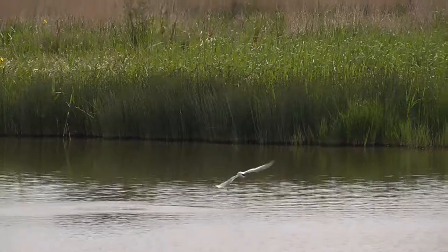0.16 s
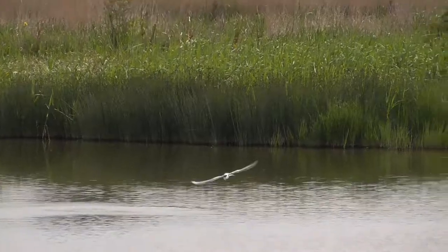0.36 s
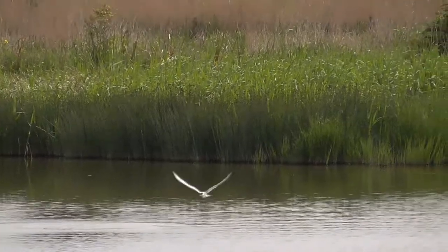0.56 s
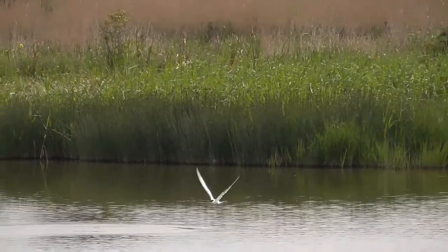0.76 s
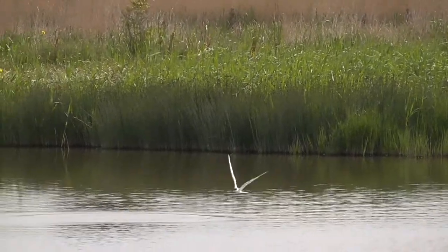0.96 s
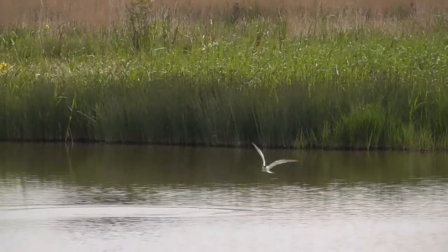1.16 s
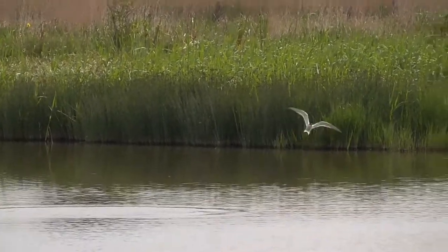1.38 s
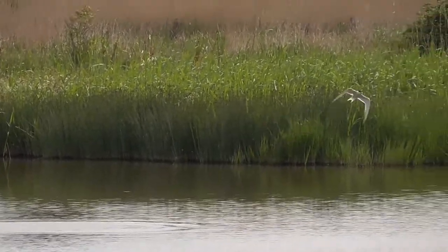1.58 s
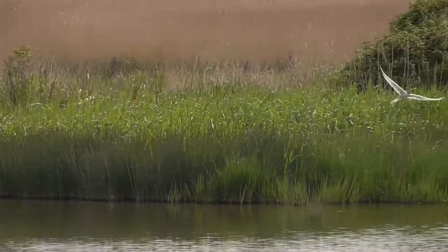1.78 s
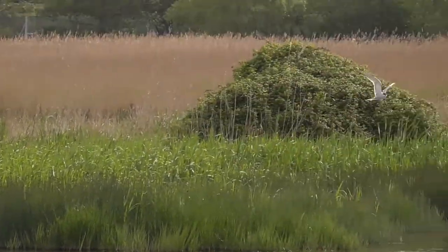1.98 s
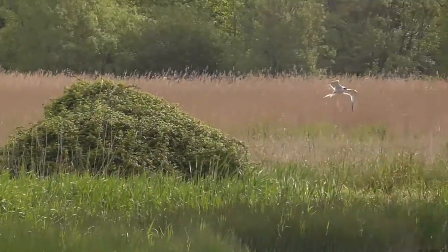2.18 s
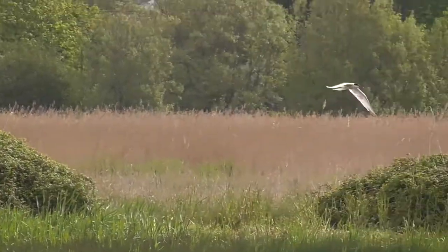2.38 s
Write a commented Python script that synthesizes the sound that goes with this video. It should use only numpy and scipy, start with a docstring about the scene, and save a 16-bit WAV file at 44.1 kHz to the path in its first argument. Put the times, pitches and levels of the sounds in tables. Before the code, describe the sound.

A tern gives two short, lightly echoing cries over a reedy pond, above a steady roar of distant traffic. A camera's focus motor ticks faintly at the microphone, and its plastic body snaps loudly near the end.

```python
"""Soft plastic clicks and the roar and hum of far traffic open out of a short silence. A tern calls
twice over a reed-fringed pond, each call an arching stack of harmonics that echoes off the banks.
A small bird whistles faintly. Up close, a camera's focus motor ticks in short runs, ringing its gears,
and the plastic body gives one loud snap near the end. The sound is nearly mono."""
import sys
import numpy as np
from scipy import signal
from scipy.io import wavfile
from scipy.ndimage import uniform_filter1d

SR = 44100
rng = np.random.default_rng(int(sys.argv[2]) if len(sys.argv) > 2 else 0)


def dump_mix(stems):
    """Bounce the given channels to the path in sys.argv[1] as a 16-bit WAV at rate SR."""
    frames = np.atleast_2d(stems).T  # one column per channel
    limited = np.clip(frames, -1, 1)  # hard clip at full scale
    pcm = np.round(limited * 32767).astype(np.int16)
    wavfile.write(sys.argv[1], SR, pcm)


N = 112014


def amp(db):
    return 10 ** (np.asarray(db, float) / 20)


def unit_rms(x):
    return x / np.sqrt(np.mean(x ** 2) + 1e-20)


def add(mix, start_s, sound):
    part = mix[..., round(start_s * SR):][..., :sound.shape[-1]]
    part += sound[..., :part.shape[-1]]


def jitter(count, smoothing):
    """Smoothed noise of rms 1."""
    return unit_rms(uniform_filter1d(rng.standard_normal(count), size=smoothing))


def drift(t, top_hz):
    """Slow random wander of rms 1."""
    rates = np.geomspace(.2, top_hz, 20)
    return unit_rms(sum(np.sin(2 * np.pi * (hz * t + rng.random())) / np.sqrt(hz) for hz in rates))


def ring(modes, gains, rise_s, stretch=1, phase=0):
    """Dying sines of a struck object; neighbouring modes alternate in polarity."""
    t = np.arange(3000) / SR
    tones = 0
    for k, (gain, (hz, db, t60)) in enumerate(zip(gains, modes)):
        decay = amp(db - 60 * t / (t60 * stretch))
        tones += (-1) ** k * gain * decay * np.sin(2 * np.pi * hz * t + phase * k)
    return tones * np.minimum(t / rise_s, 1)


def housing_notch_db(hz, centre_hz=5650, width_hz=600, depth_db=-16):
    """The microphone housing swallows a band of the tern's voice."""
    return depth_db * np.exp(-((hz - centre_hz) / width_hz) ** 2)


# Contour of a call: (position [share of length], pitch [share of top pitch], level [dB])
CALL_CONTOUR = [(0, .94, -12), (.06, .945, -2), (.23, .975, 0), (.36, .997, 0), (.48, 1.0, 0),
                (.62, .97, -2), (.74, .89, -6), (.82, .78, -10), (.92, .66, -13), (1, .62, -20)]


def tern_call(length_s, top_hz, gain_db, rise_depth, harmonics_db, dulling_db=-30, rasp=.8):
    """A clean harmonic cry that arches, then turns dull and raspy as its pitch drops."""
    position, pitch, db = np.transpose(CALL_CONTOUR)
    progress = np.arange(0, 1, 1 / (length_s * SR))
    arch = uniform_filter1d(np.interp(progress, position, pitch), size=150, mode="nearest")
    drop = (1 - arch) * (progress > position[np.argmax(pitch)])
    hz = top_hz * (1 - drop - rise_depth * (1 - arch - drop))
    shake = jitter(4000, smoothing=30)[:len(progress)]
    cycles = np.cumsum(hz * (1 + (0.003 + 0.05 * drop) * shake)) / SR
    voice = 0
    for k, harmonic_db in enumerate(harmonics_db, 1):
        colour_db = dulling_db * max(k - 3, 0) * drop ** 2 + housing_notch_db(k * hz)
        voice += amp(harmonic_db + colour_db) * np.sin(2 * np.pi * k * cycles)
    envelope = amp(gain_db + np.interp(progress, position, db)) * np.minimum((1 - progress) * 30, 1)
    return np.sqrt(2) * envelope * voice * (1 + rasp * drop * shake[::-1])


# Tern cues: (start [s], length [s], top pitch [Hz], gain [dB], echo send [dB], rise depth [0-1])
TERN_CALLS = [(0.4012, 0.0475, 1738, -46, -10, 1.0), (0.8462, .0468, 1770, -49.5, 4, .68)]
# Tone of each call, the bird facing differently: (harmonic 1 [dB], ..., harmonic 8 [dB])
CALL_HARMONICS = [
    [-6, 0, -15.5, -20, -12.5, -18, -26, -35],
    [-4, 0, -7, -11, -13, -10.5, -18, -29],
]
# Slapback off the banks: (delay [s], gain on the echo send [dB])
BANK_ECHOES = [(.045, -21.5), (0.188, -30)]


def tern(reeds_db=-11.5, reeds_t60=0.17, echo_top_hz=8000):
    """Two calls over the pond: the reeds scatter a short tail, the banks return darker echoes."""
    out = np.zeros(N)
    t = np.arange(SR // 2) / SR
    for (start, length, top_hz, gain_db, send_db, depth), harmonics in zip(TERN_CALLS, CALL_HARMONICS):
        call = tern_call(length, top_hz, gain_db, depth, harmonics)
        tail = rng.standard_normal(len(t)) * amp(-60 * t / reeds_t60) * np.minimum(t / 0.011, 1)
        add(out, start, call)
        add(out, start, amp(reeds_db) * signal.fftconvolve(call, tail / np.linalg.norm(tail)))
        echo = signal.lfilter(*signal.butter(2, echo_top_hz, fs=SR), call)
        for delay, bank_db in BANK_ECHOES:
            add(out, start + delay, amp(bank_db + send_db) * echo)
    return out


# Snap cues: (time [s], gain [dB], tilt [dB/octave], time stretch [x], rattle [dB], stereo side [dB])
BODY_SNAPS = [(0.122, -54.5, -13, 0.57, -11.5, -19), (0.1328, -53.5, -4, .8, -11.5, -40),
              (0.194, -52.5, 5, 0.37, -30, -43), (0.8394, -50, 15, 0.56, -35, -21),
              (1.953, -55.5, 14, .4, -38, -38), (2.4087, -20, 1, 1.04, -35.5, -30.5),
              (2.4655, -61, 10, 0.41, -38, -35)]
# Ring of the plastic shell: (pitch [Hz], level before tilt [dB], t60 before stretch [s])
BODY_MODES = [(940, -6, 0.01), (1130, -3.5, 0.012), (1314, -6.5, 0.017), (2370, -2, 0.0085),
              (3200, -7.5, 0.0062), (3953, -1, 0.011), (4267, -1, 0.011), (4700, -5.5, 0.014),
              (5770, -12.5, 0.0093), (7580, -7, 0.0077), (8700, -6, 0.0059), (9130, -0.5, 0.0089),
              (9800, -5, 0.0033), (10630, -6, 0.0074), (12150, -12, 0.0037), (14300, -16, 0.008),
              (15300, -14, .008)]
# Slips within one snap: (delay before stretch [s], level [dB])
SNAP_SLIPS = [(0, 0), (.0005, -3), (.0011, 0), (.002, -3), (.0033, -15), (.0062, -21), (.0085, -24)]


def body_snaps(rattle_hz=3950, rattle_t60=.18, tilt_top_hz=10300):
    """The plastic slips in a few quick steps, ringing the body and leaving a short rattle."""
    out = np.zeros((2, N))
    t = np.arange(8000) / SR
    rattle_band = signal.butter(2, [rattle_hz * 0.8, rattle_hz * 1.2], "band", fs=SR)
    for start, gain_db, tilt_db, stretch, rattle_db, side_db in BODY_SNAPS:
        gains = amp([tilt_db * np.log2(min(hz, tilt_top_hz) / 6000) for hz, _, _ in BODY_MODES])
        blow = np.array([ring(BODY_MODES, gains, 0.00025, stretch),
                         ring(BODY_MODES, gains, 0.00019, stretch, phase=0.84)])
        snap = np.zeros((2, len(t)))
        for delay, slip_db in SNAP_SLIPS:
            add(snap, delay * stretch, amp(slip_db) * blow)
        mid, side = snap / np.linalg.norm(snap[0, :200]) * 5.98  # even out the attack energy
        rattle = unit_rms(signal.lfilter(*rattle_band, rng.standard_normal(len(t))))
        mid = mid + amp(rattle_db - 60 * t / rattle_t60) * rattle
        add(out, start, amp(gain_db) * (mid + amp(side_db) * side * [[1], [-1]]))
    return out


# Bursts of ticking: (start [s], end [s], gain [dB])
MOTOR_RUNS = [(0.232, .355, -64.5), (0.473, .535, -63.5), (0.593, .615, -68), (0.675, .755, -62.5),
              (0.912, .955, -62.5), (1.074, 1.215, -64), (1.335, 1.415, -63), (1.514, 1.515, -63.5),
              (1.554, 1.555, -63), (1.656, 1.755, -64), (1.794, 1.895, -65), (1.934, 1.935, -64),
              (1.993, 1.995, -65), (2.036, 2.055, -65.5), (2.094, 2.295, -63), (2.335, 2.356, -62.5)]
# Ring of the gears: (pitch [Hz], level [dB], t60 [s])
GEAR_MODES = [(2190, 5.5, 0.021), (2980, 2.5, 0.0081), (3770, 0.5, 0.018), (4550, 0, 0.013),
              (4940, -6, 0.028), (5540, -5.5, 0.013), (9170, 3.5, 0.0081)]


def focus_motor(tick_s=1 / 50, spread_db=1.5):
    """The motor steps fifty times a second while it runs, each uneven step ringing the gears."""
    steps = np.zeros(N)
    unevenness_db = spread_db * rng.standard_normal(N)
    for start, end, db in MOTOR_RUNS:
        ticks = np.round(np.arange(start, end + tick_s / 4, tick_s) * SR).astype(int)
        steps[ticks] = amp(db + unevenness_db[ticks])
    return signal.oaconvolve(steps, ring(GEAR_MODES, np.ones(len(GEAR_MODES)), rise_s=0.0011))[:N]


# Glide points, one list per whistle: (time [s], pitch [Hz], level [dB])
BIRD_GLIDES = [
    [(1.468, 4330, -84), (1.482, 4430, -79), (1.498, 4740, -75), (1.509, 4380, -77), (1.518, 4450, -78),
     (1.53, 4200, -88)],
    [(2.196, 4370, -86), (2.205, 4300, -71), (2.214, 4650, -80), (2.223, 4780, -75), (2.235, 4740, -79),
     (2.258, 3650, -73), (2.272, 3180, -72), (2.282, 2950, -88)],
]


def small_bird(flutter_db=3.2):
    """Faint whistles: gliding sines whose level flutters."""
    out = np.zeros(N)
    for note in BIRD_GLIDES:
        times, hz, db = np.transpose(note)
        t = np.arange(times[0], times[-1], 1 / SR)
        envelope = amp(np.interp(t, times, db) + flutter_db * jitter(len(t), smoothing=200))
        cycles = np.cumsum(np.interp(t, times, hz)) / SR
        add(out, times[0], np.sqrt(2) * envelope * np.sin(2 * np.pi * cycles))
    return out


# Engine drones: (starting pitch [Hz], glide [Hz/s])
ENGINE_PITCHES = [(72.8, -0.3), (100.2, 6.5), (215.5, 1)]
# Fader moves of the drones: (time [s], hum 1 [dB], hum 2 [dB], hum 3 [dB])
ENGINE_LEVELS = [(0.2, -77, -71, -80), (0.7, -73.5, -69, -74.5), (1.66, -64, -69.5, -66.5),
                 (1.88, -79, -64, -81), (2.0, -61, -73, -74), (2.14, -90, -69.5, -70.5),
                 (2.2, -64, -69.5, -78), (2.5, -69.5, -66.5, -75)]


def engine_hums(waver_db=2.5):
    """Far engines hum as three low sines that glide slowly and waver in level."""
    out = np.zeros(N)
    t = np.arange(N) / SR
    times, *levels = np.transpose(ENGINE_LEVELS)
    for (hz, glide), db in zip(ENGINE_PITCHES, levels):
        waver = np.interp(t, t[::500], drift(t[::500], top_hz=3.24))
        envelope = amp(np.interp(t, times, db) + waver_db * waver)
        cycles = hz * t + glide * t ** 2 / 2 + rng.random()
        out += np.sqrt(2) * envelope * np.sin(2 * np.pi * cycles)
    return out


# EQ of the traffic bed: (frequency [Hz], relative level [dB])
ROAR_EQ = [(30, -30), (45, -7.5), (60, -23), (90, -6), (130, -8.5), (170, -22), (230, -13.5), (290, -13.5),
           (400, -9.5), (552, -2.5), (700, -3.5), (880, 1), (1100, -5.5), (1400, -7.5), (1900, -24)]
# Hiss above it, coloured by the microphone housing: (frequency [Hz], relative level [dB])
HISS_EQ = [(2200, -22), (2600, -28), (3100, -33), (3700, -28), (4200, -33), (5000, -33.5), (5500, -39),
           (6200, -40.5), (7000, -35), (8000, -32), (9300, -32), (10500, -34), (12500, -35), (14300, -37.5),
           (15500, -41)]
# Fader moves of the low rumble: (time [s], bass shelf gain [dB])
RUMBLE_GAIN = [(.1, -2.5), (.7, -5.5), (1.2, -2.5), (1.6, 0.5), (2.0, -4.5), (2.5, -5)]


def traffic_roar(level_db=-50, shelf_hz=158):
    """Far traffic blurs into a noise bed with drifting colour, a slow swell and a hiss on top."""
    frames = N // 256 + 5
    t = np.arange(frames) * 256 / SR
    hz = np.fft.rfftfreq(1024, 1 / SR)
    real, imag, patches = rng.standard_normal((frames, 513, 3)).T
    patches = unit_rms(uniform_filter1d(uniform_filter1d(patches, 8, axis=0), 10, axis=1))
    eq_hz, eq_db = np.transpose(ROAR_EQ + HISS_EQ)
    colour_db = np.interp(np.log(hz + 1), np.log(eq_hz), eq_db, right=-60)[:, None]
    motion_db = 0.77 * patches + 0.26 * drift(t, top_hz=1.5)
    rumble_db = np.interp(t, *np.transpose(RUMBLE_GAIN)) / (1 + (hz[:, None] / shelf_hz) ** 4)
    spectrum = (real + 1j * imag) * amp(colour_db + motion_db + rumble_db)
    noise = signal.istft(spectrum, nperseg=1024, noverlap=768)[1][:N]
    return amp(level_db) * unit_rms(noise)


def scene():
    """Birds and camera over the traffic bed; only the snaps have stereo width."""
    return traffic_roar() + engine_hums() + tern() + small_bird() + focus_motor() + body_snaps()


def record(dry, low_cut_hz=47, open_s=.1225, high_cut_hz=15950):
    """The microphone cuts the deep bass, opens sharply after a silence and loses the top treble."""
    cut = signal.sosfilt(signal.butter(6, low_cut_hz, "high", fs=SR, output="sos"), dry)
    opened = cut * np.clip((np.arange(N) / SR - open_s) / .001, 0, 1)
    high_cut = signal.firwin(511, high_cut_hz, window=("kaiser", 9), fs=SR)
    return signal.oaconvolve(opened, high_cut[None], "same")


dry = scene()
out = record(dry)
dump_mix(out)
```